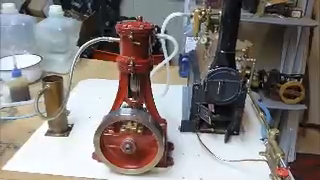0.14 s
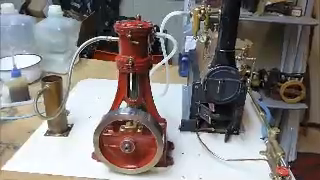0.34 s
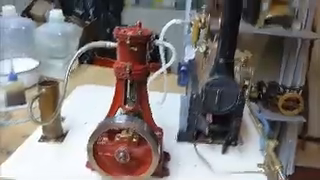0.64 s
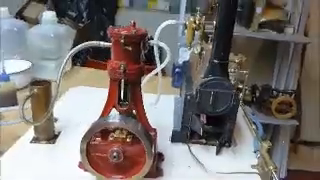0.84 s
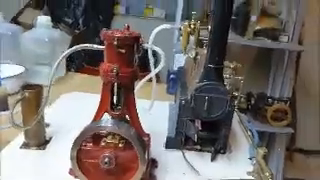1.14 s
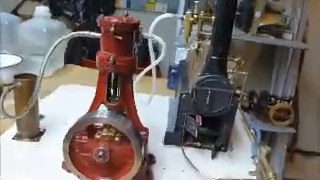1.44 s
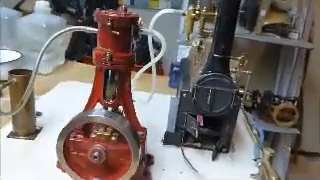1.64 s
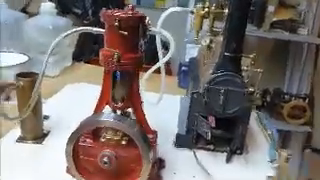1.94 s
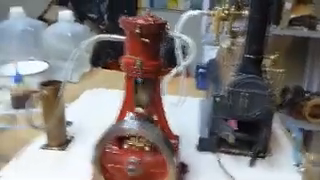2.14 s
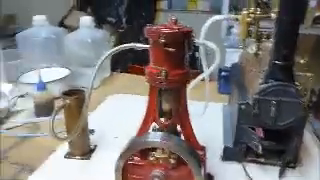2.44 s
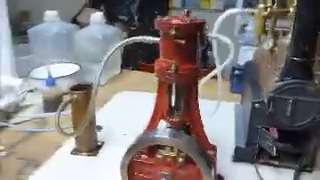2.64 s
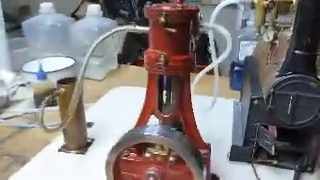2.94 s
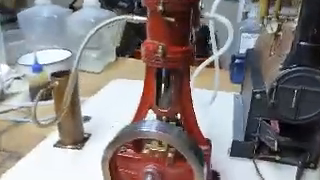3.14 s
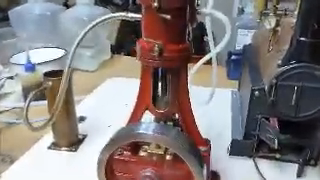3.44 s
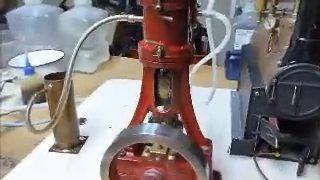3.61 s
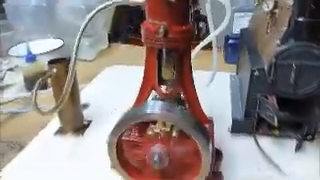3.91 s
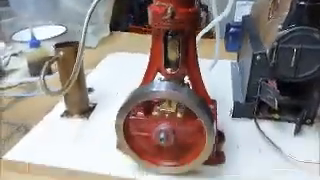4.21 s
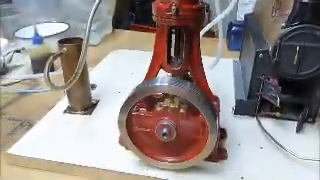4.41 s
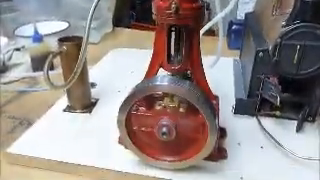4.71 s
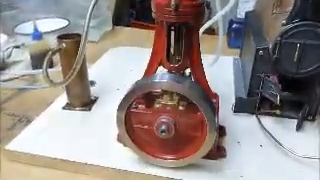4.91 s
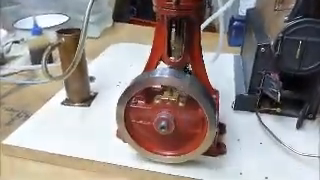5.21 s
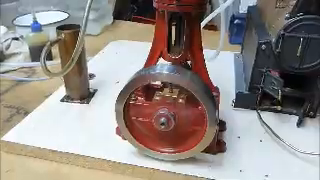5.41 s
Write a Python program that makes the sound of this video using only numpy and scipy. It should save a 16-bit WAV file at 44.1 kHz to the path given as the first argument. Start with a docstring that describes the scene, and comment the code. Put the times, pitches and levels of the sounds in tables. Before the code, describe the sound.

Brisk clacking of a miniature steam engine, about three and a half knocks a second, with twin exhaust puffs each turn blowing a pot.

```python
"""A model vertical steam engine on a workbench in a quiet workshop, heard by two close microphones.
From the start, two exhaust strokes a turn hiss out through a hose and blow a breathy note in an upright brass pot.
Slack bearings tap lightly several times a turn and, from 0.23 s, knock hard once, ringing iron frame and bench.
The pot overblows near 0.8 s; a hollow tone swells at 1.25 s and 4.05 s; the pot's note dies away after 2.9 s.
Stray linkage ticks fall at 3.2, 4.4 and 4.7 s; the crank turns about 3.4 times a second and speeds up near the end."""
import sys
import numpy as np
from scipy import signal
from scipy.fft import rfft, irfft, next_fast_len
from scipy.io import wavfile
from scipy.ndimage import map_coordinates

SR = 44100
rng = np.random.default_rng(int(sys.argv[2]) if len(sys.argv) > 2 else 0)


def to_wav(sig):
    """Store sig (one row per channel, or 1-D mono) as 16-bit WAV at the path in sys.argv[1].

    Samples outside -1..1 are clipped; the rate is SR.
    """
    pcm = np.clip(np.atleast_2d(sig), -1, 1) * 32767
    pcm = np.round(pcm).astype(np.int16)
    wavfile.write(sys.argv[1], SR, pcm.T)  # frames by channels


N = 245195

# the big-end knock, once a turn: t/s, relative clack level/dB, relative frame ring level/dB
BIG_END_KNOCKS = [(0.2314, -11.5, -24), (0.5206, -15, -26.5), (0.807, -10, -25), (1.0934, -14, -23.5),
                  (1.3843, -10.5, -24), (1.6729, -10.5, -31.5), (1.9634, -17.5, -26.5),
                  (2.2558, -18, -27.5), (2.5506, -17, -23), (2.8456, -16.5, -27), (3.1401, -18, -23),
                  (3.4297, -18.5, -26.5), (3.7263, -17.5, -22), (4.025, -15, -23), (4.3215, -14.5, -22.5),
                  (4.6052, -15.5, -23), (4.871, -14, -22), (5.1189, -15.5, -23.5), (5.3544, -21, -24)]
# modes of bench and base board: f/Hz, relative level/dB, t60/s
BENCH_MODES = [(204.7, -14, 0.25), (258.5, -20, 0.27), (305.4, 2.5, 0.082), (341, -14, 0.32),
               (381.8, -5, 0.15), (437.2, 2, 0.052), (453.4, 3.5, 0.056), (488.3, -1, 0.094),
               (524.6, -11, 0.26), (661, -1, 0.072), (774, -24.5, 0.28), (1043, -1, 0.028)]
PUNCH_HZ, PUNCH_DB, PUNCH_T60_S = 345, 2.5, 0.04  # the heavily damped base itself, against the thud
GEAR_DB_PER_DOUBLING = 12  # light contacts and piston push grow with speed


def amp(db):
    """Amplitude factor of a level in dB."""
    return 10 ** (np.asarray(db) / 20)


def unit(x):
    """Scale x to rms 1."""
    return x / np.sqrt(np.mean(x ** 2) + 1e-20)


def along(points, hz):
    """Read (f/Hz, value) points on a log frequency axis."""
    f, v = np.transpose(points)
    return np.interp(np.log(hz + 1), np.log(f + 1), v)


def filtered(x, response):
    """Multiply the spectrum of x by a response of frequency."""
    size = next_fast_len(x.shape[-1] + SR // 4)
    spectrum = rfft(x, size) * response(np.fft.rfftfreq(size, 1 / SR))
    return irfft(spectrum, size)[..., :x.shape[-1]]


def wobble(rate):
    """A smooth random curve, rate knots a second."""
    knots = rng.standard_normal(int(N * rate / SR) + 4)
    return map_coordinates(knots, [np.arange(N) * rate / SR])


def rush(colour):
    """Stereo noise of rms 1, coloured by a gain of frequency; mid and side set how alike the sides are."""
    # f/Hz, left-right likeness (correlation)
    alike = [(100, 0.7), (300, 0.93), (1000, 0.88), (3000, 0.69), (12000, 0.72)]

    def mid_side_gains(hz):
        turn = np.arccos(np.clip(along(alike, hz), -1, 1)) / 2
        return colour(hz) * np.array([np.cos(turn), np.sin(turn)])

    mid, side = filtered(rng.standard_normal((2, N)), mid_side_gains)
    return unit(np.array([mid + side, mid - side]))


def fade(t, t60):
    """Exponential decay by 60 dB in t60 seconds."""
    return np.exp(-np.log(1000) * t / t60)


def ring(modes, rise):
    """One blow on a body: its modes swell with time constant rise, each at a slightly new strength."""
    t = np.arange(SR // 4) / SR
    hz, db, t60 = np.transpose(modes)[..., None]
    strength = amp(db + 1.3 * rng.standard_normal(db.shape))
    partials = strength * np.sin(2 * np.pi * hz * t) * fade(t, t60)
    return partials.sum(0) * (1 - np.exp(-t / rise))


def crack(hz, octaves, t60):
    """A dying burst of contact noise around hz."""
    t = np.arange(SR // 4) / SR
    band = lambda f: np.exp(-.5 * (np.log2((f + 1) / hz) / octaves) ** 2)
    return unit(filtered(rng.standard_normal(len(t)), band)) * fade(t, t60)


def add(track, s, sound):
    """Mix a sound in at time s."""
    start = int(round(s * SR))
    if 0 <= start < N:
        track[start:start + len(sound)] += sound[:N - start]


def turn_times():
    """The start of every crank turn, carried on one turn at each end."""
    s = np.array(BIG_END_KNOCKS)[:, 0]
    return np.concatenate([[2 * s[0] - s[1]], s, [2 * s[-1] - s[-2]]])


def speed(s):
    """Crank speed at times s, in doublings above idle."""
    idle_turns_per_s = 3.41
    starts = turn_times()
    periods = np.diff(starts)
    return np.interp(s, starts[:-1] + periods / 2, -np.log2(periods * idle_turns_per_s))


def closeness(s):
    """Engine level (dB) as the microphone closes in and then draws back a little."""
    # t/s, level/dB
    near_points = [(0, -1.5), (.8, -0.5), (2, 0.5), (3.3, 1.6), (5.56, 0.5)]
    return np.interp(s, *np.transpose(near_points))


def shop_air():
    """The quiet workshop around the bench: steady coloured noise."""
    # f/Hz, relative level/dB
    shop_colour = [(25, -58), (60, -18.5), (120, -3), (165, -21), (200, -1), (400, -45), (700, -17),
                   (1500, -8.5), (4000, -21.5)]
    return amp(-50) * rush(lambda hz: amp(along(shop_colour, hz)))


def strokes(t):
    """Exhaust flow and jet strength (dB) as the valve opens and shuts twice a turn."""
    # exhaust strokes: port opens at share of the turn, stays open for share of the turn, level/dB
    exhaust_strokes = [(0.464, 0.4, 0), (0.963, 0.33, -2.15)]
    open_turns, close_turns = 0.0059, 0.079  # the flow rises, holds and dies onto a steady leak
    leak_db, jet_leak_db = -10, -4
    spurt_db, spurt_turns = 2.5, 0.048  # the jet spurts as the port opens
    # and swells again as the piston sweeps the cylinder
    sweep_db, sweep_peak_turns, sweep_width_turns = 0.5, .29, 0.12
    starts = turn_times()
    crank = np.interp(t, starts, np.arange(len(starts)))
    flow_power, jet_power = amp(leak_db) ** 2, amp(jet_leak_db) ** 2
    for opens, length, db in exhaust_strokes:
        since = (crank - opens) % 1
        opening = 1 - np.exp(-since / open_turns)
        closing = np.exp(-np.maximum(since - length, 0) / close_turns)
        port = amp(db) * opening * closing
        spurt = amp(spurt_db) * np.exp(-since / spurt_turns)
        sweep = amp(sweep_db) * np.exp(-.5 * ((since - sweep_peak_turns) / sweep_width_turns) ** 2)
        flow_power = flow_power + port ** 2
        jet_power = jet_power + (amp(db) * port * (spurt + sweep)) ** 2
    return 10 * np.log10(flow_power), 10 * np.log10(jet_power)


def walls(x):
    """Close reflections from bench, boiler and shelves comb the hiss."""
    # delay t/s, level/dB
    reflections = [(.0022, -34), (.0039, -17.5), (.0063, -18), (0.0097, -14.5)]
    echo = lambda hz: sum(amp(db) * np.exp(-2j * np.pi * hz * delay) for delay, db in reflections)
    return filtered(x, lambda hz: 1 + echo(hz))


def pot_tone(airy_db, note_db):
    """Steam blown across the pot: a wavering, fluttering note inside a band of breathy noise."""
    # odd quarter-wave resonances: f/Hz, half width/Hz, relative level/dB
    pot_modes = [(939, 73, 4.5), (2975, 55, -5.5)]
    # the pot briefly overblows to its upper resonance: t/s, level/dB
    overblow = [(.70, -64), (.752, -40), (.782, -32.5), (.80, -65)]
    resonance = lambda f, centre, width: 1 / (1 + ((f - centre) / width) ** 2)
    hz = 938 + 15 * wobble(22)
    note = unit(amp(2 * wobble(40)) * np.sin(2 * np.pi * np.cumsum(hz) / SR))
    airy = rush(lambda f: sum(amp(db) * resonance(f, centre, width) for centre, width, db in pot_modes))
    upper_db = np.interp(np.arange(N) / SR, *np.transpose(overblow))
    upper = rush(lambda f: resonance(f, *pot_modes[1][:2]))
    return amp(note_db) * note + amp(airy_db) * airy + amp(upper_db) * upper


def bench_response(hz):
    """The bench as a sum of damped resonances, each weighted by its decay time."""
    total = 0
    for centre, db, t60 in BENCH_MODES:
        detuning = (hz - centre) * t60 * np.pi / np.log(1000)
        total = total + amp(db) / (1 + 1j * detuning) * t60
    return total


def steam():
    """Strokes let out a bright jet and a dull rush and blow the pot; sliding parts grumble in the bench."""
    # bright jet: f/Hz, relative level/dB
    jet_colour = [(1500, -26), (3300, 0), (5100, 5.5), (6500, 2.5), (7200, 5), (7650, -4), (8350, 4.5),
                  (9100, -1), (9900, 7), (10700, 1), (12000, 1.5), (13000, -1.5), (14600, 0), (15500, -18)]
    # dull exhaust rush: f/Hz, relative level/dB
    exhaust_colour = [(150, -56), (300, -43), (480, 1), (580, -3), (780, -1), (840, 0.5), (930, -2.5),
                      (1080, 4.5), (1220, -3.5), (1600, -7.5), (2400, -3.5), (3000, -1), (3350, -11),
                      (8000, -17)]
    # microphone distance to the cylinder: t/s, level/dB
    cylinder_closeness = [(0, -0.84), (2.4, -0.56), (3.2, 1.16), (5.56, 1)]
    t = np.arange(N) / SR
    flow_db, spurt_db = strokes(t)
    fast, near_db = speed(t), np.interp(t, *np.transpose(cylinder_closeness))
    # base level at idle, then growth in dB per doubling of speed
    jet_db = -38 + 12 * fast + near_db
    exhaust_db = -37.5 + 14.5 * fast + near_db
    grumble_db = -42.5 + 3 * fast + near_db
    airy_db = -38 + 4 * fast
    # the note sags slowly (dB a second), then dies away
    note_hold_s, note_release_db_per_s = 2.9, 35
    note_db = -37 - 2.9 * t - note_release_db_per_s * np.maximum(t - note_hold_s, 0)

    # wet steam sputters, so the hiss has gusts and a fine grain
    gusts_db = .7 * wobble(14)
    jet_hiss = walls(rush(lambda hz: amp(along(jet_colour, hz))))
    jet = amp(jet_db + spurt_db + gusts_db) * unit(amp(0.79 * wobble(900)) * jet_hiss)
    exhaust_hiss = walls(rush(lambda hz: amp(along(exhaust_colour, hz))))
    exhaust = amp(exhaust_db + flow_db + 1.53 * wobble(120)) * unit(exhaust_hiss)

    # the air in the pot takes a moment to follow; the note needs a strong flow
    pot_lag_s, note_swing = 0.013, 1.17
    blow_db = np.interp(t - pot_lag_s, t, flow_db)
    pot_pan = amp(1.5 * np.array([[.5], [-.5]]))  # dB, left minus right
    tone = pot_tone(airy_db + blow_db, note_db + note_swing * blow_db) * pot_pan

    grumble_band = lambda hz: 1 / (1 + (hz / 700) ** 4) / (1 + (175 / (hz + 1)) ** 8)
    grumble_noise = rush(lambda hz: bench_response(hz) * grumble_band(hz))
    grumble = amp(grumble_db + .5 * flow_db) * grumble_noise
    return jet + exhaust + tone + grumble


def valve_gear():
    """Crosshead and valve rod take up their play at set crank angles, harder at speed."""
    # light contacts: share of the turn, relative thud level/dB, relative rattle level/dB,
    # tick f/Hz, extra tick growth/dB per doubling of speed
    gear_contacts = [(.484, -34, -40.5, 2580, -9), (.534, -22, -35, 2470, -9),
                     (0.567, -35.5, -37, 2790, -2), (.645, -23, -34, 2930, -32),
                     (.931, -25.5, -33.5, 4300, 13)]
    taps, rattles, starts = np.zeros(N), np.zeros(N), turn_times()
    for start, period in zip(starts, np.diff(starts)):
        for share, thud_db, rattle_db, tick_hz, growth_db in gear_contacts:
            s = start + share * period + rng.normal(0, 0.000789)
            # contacts differ from turn to turn
            force_db = closeness(s) + GEAR_DB_PER_DOUBLING * speed(s) + rng.normal(0, 1.5)
            thud = ring(BENCH_MODES, rise=0.005)
            thud = thud + ring([(PUNCH_HZ, PUNCH_DB, PUNCH_T60_S)], rise=0.00084)
            tick = amp(2.0 + growth_db * speed(s)) * crack(hz=tick_hz, octaves=0.34, t60=0.02)
            add(taps, s, amp(force_db) * (amp(thud_db - 7.0) * thud + amp(rattle_db) * tick))
            rattle = crack(hz=1800, octaves=0.8, t60=0.089)
            add(rattles, s, amp(force_db + rattle_db - 3) * rattle)
    # loose parts chatter, which breaks each rattle into grains
    chatter_db, chatter_per_s = 4, 260
    return taps + rattles * unit(amp(chatter_db * wobble(chatter_per_s)))


def board(x):
    """A small base board radiates almost nothing below its lowest mode."""
    return signal.sosfilt(signal.butter(4, 185, "highpass", fs=SR, output="sos"), x)


def room(x):
    """Nearby shelves and walls answer after a few milliseconds."""
    # f/Hz, t60/s
    room_decay = [(200, 0.35), (2000, 0.15), (10000, 0.022)]
    hz, t, z = signal.stft(rng.standard_normal((3, SR // 3)), SR, nperseg=256)
    faded = z * fade(t, along(room_decay, hz)[:, None])
    shared, *apart = signal.istft(faded, SR, nperseg=256)[1]
    # the two close microphones share the bass
    tail = shared + filtered(np.array(apart), lambda f: f / (f + 1500))
    delayed = np.pad(x, (SR // 200, 0))
    return signal.fftconvolve(delayed[None], tail / np.linalg.norm(tail[0]), axes=1)[:, :N]


def shake():
    """The reversing piston softly pushes the bench twice a turn, stirring its lowest mode and a slow sway."""
    # the piston stops at both ends of its stroke: share of the turn, relative level/dB
    dead_centres = [(0.501, -23.5), (0.992, -25.5)]
    rise_s, sway_db = 0.0064, -36
    near_share = 2.4  # the deep push gains more than the rest as the microphone nears
    out, starts = np.zeros(N), turn_times()
    swell = 1 - np.exp(-np.arange(SR // 4) / SR / rise_s)
    for start, period in zip(starts, np.diff(starts)):
        for share, db in dead_centres:
            s = start + share * period
            sway = amp(sway_db) * swell * crack(hz=60, octaves=1.0, t60=0.11)
            push_db = db + near_share * closeness(s) + GEAR_DB_PER_DOUBLING * speed(s)
            add(out, s, amp(push_db) * (ring(BENCH_MODES[:1], rise=rise_s) + sway))
    return out


def clank(hz, t60):
    """Bending waves in the iron frame: the high ones arrive first, so the ring slides down onto its note."""
    t = np.arange(SR // 4) / SR
    glide = 1 + .32 * np.exp(-t / .0022)
    swell = 1 - np.exp(-t / .0028)
    return np.sin(2 * np.pi * np.cumsum(hz * glide) / SR) * swell * fade(t, t60)


def big_end():
    """At the load reversal the rod slams across its slack: clack, frame ring, then the bench and a rebound."""
    # rod and crank, rung by hard metal contact: f/Hz, relative level/dB, t60/s
    rod_modes = [(1735, -8, 0.064), (2120, -21, 0.022), (2490, 6.5, 0.016), (2646, 12, 0.02),
                 (3784, 11, 0.0096)]
    clack_noise_db, rod_db = -10, -12.5  # against the clack
    frame_offset_db, frame_noise_db = 11.5, -18  # main ring; the many crowded modes against it
    base_frame_hz, frame_sag_hz_per_db = 1343, 43  # a harder clack than usual rings the frame lower
    base_thud_db, thud_db_per_doubling = -20, 6.5  # one base level for all knocks; grows with speed
    rebound_db, rebound_s = -10, 0.006716
    out = np.zeros(N)
    usual_db = np.median([clack_db - closeness(s) for s, clack_db, _ in BIG_END_KNOCKS])
    for s, clack_db, frame_db in BIG_END_KNOCKS:
        # the harder the contact, the more of it goes into the rod
        hard_db = clack_db - closeness(s) - usual_db
        add(out, s, amp(clack_db + rod_db + 0.34 * hard_db) * ring(rod_modes, rise=0.0024))
        add(out, s, amp(clack_db + clack_noise_db) * crack(hz=2480, octaves=0.62, t60=0.018))

        frame_hz = base_frame_hz - frame_sag_hz_per_db * max(hard_db - 2, 0)
        ring_db = frame_db + frame_offset_db
        add(out, s + 0.00016, amp(ring_db) * clank(frame_hz, t60=0.034))
        frame_noise = crack(hz=frame_hz, octaves=0.41, t60=0.058)
        add(out, s + 0.001007, amp(ring_db + frame_noise_db) * frame_noise)

        # the heavy base rocks and lands again, a little differently each time
        landing = s + rebound_s + rng.normal(0, .0001)
        thud_db = base_thud_db + closeness(s) + thud_db_per_doubling * speed(s)
        add(out, s, amp(thud_db) * ring(BENCH_MODES, rise=0.006))
        add(out, s, amp(thud_db) * ring([(PUNCH_HZ, PUNCH_DB, PUNCH_T60_S)], rise=0.00067))
        add(out, landing, amp(thud_db + rebound_db) * ring(BENCH_MODES, rise=0.0027))
    return out


def moans():
    """A faint hollow tone swells and sinks; its pitch arches with its strength."""
    # start t/s, length/s, top pitch f/Hz, peak level/dB
    hollow_tones = [(1.25, 0.437, 556, -41.5), (4.05, 0.1, 527, -32)]
    drop_share = 0.1015  # share by which the pitch lies lower at the ends
    out = np.zeros(N)
    for s, length, top_hz, db in hollow_tones:
        arch = np.sin(np.linspace(0, np.pi, int(length * SR)))
        hz = top_hz * (1 - drop_share * (1 - arch))
        add(out, s, amp(db) * arch * np.sin(2 * np.pi * np.cumsum(hz) / SR))
    return out


def linkage_ticks():
    """Stray ticks of the linkage: short bursts of contact noise."""
    # t/s, relative level/dB, centre f/Hz, width/octaves
    stray_ticks = [(3.246, -19, 13300, 0.62), (4.3707, -11, 3470, 0.88), (4.734, -13.5, 2510, 0.21)]
    out = np.zeros(N)
    for s, db, hz, octaves in stray_ticks:
        add(out, s, amp(db - 8.5) * crack(hz=hz, octaves=octaves, t60=0.011))
    return out


def scene():
    """Engine and steam close to the microphones, in a quiet workshop."""
    metal = board(valve_gear() + big_end()) + linkage_ticks()
    reflected = amp(-12.5) * room(metal)
    return shop_air() + steam() + metal + reflected + shake() + moans()


def record(dry):
    """The two microphones differ slightly in level over frequency and pass nothing above a band limit."""
    # f/Hz, left minus right level/dB
    mic_balance = [(400, 0), (1000, 0), (2300, .8), (12000, 0.6)]
    top_hz = 15650
    sides = np.array([[.5], [-.5]])
    return filtered(dry, lambda hz: amp(sides * along(mic_balance, hz)) * (hz < top_hz))


dry = scene()
out = record(dry)
to_wav(out)
```